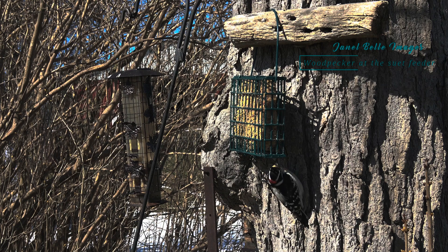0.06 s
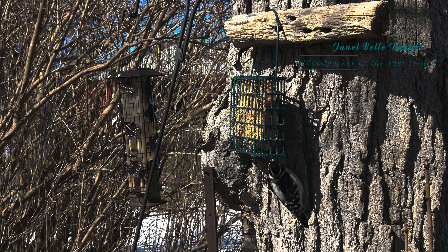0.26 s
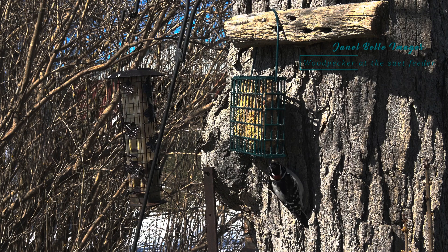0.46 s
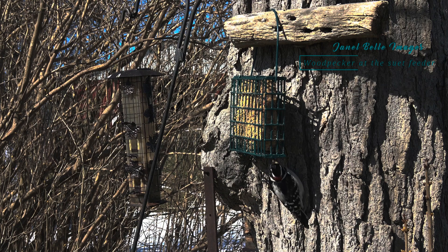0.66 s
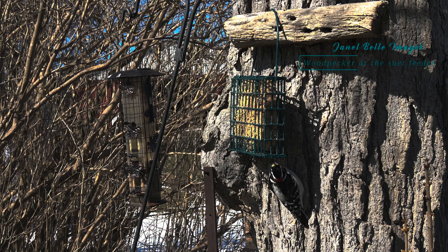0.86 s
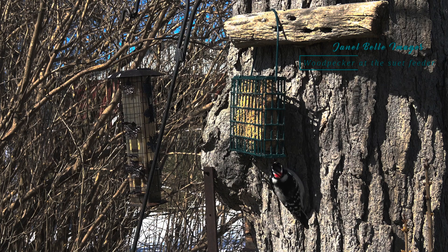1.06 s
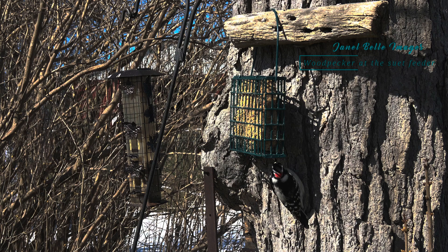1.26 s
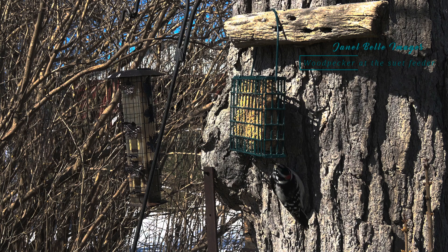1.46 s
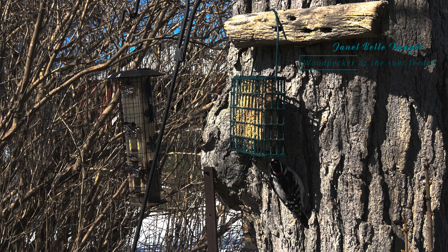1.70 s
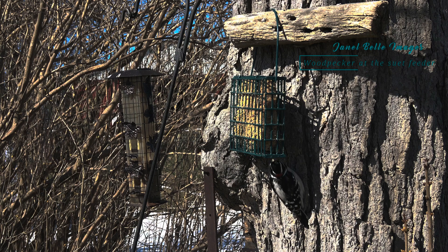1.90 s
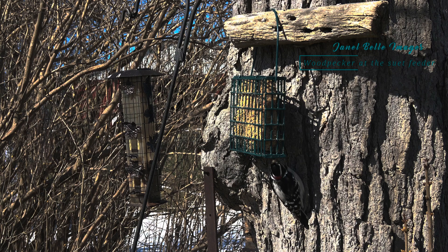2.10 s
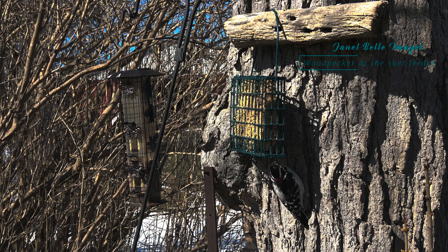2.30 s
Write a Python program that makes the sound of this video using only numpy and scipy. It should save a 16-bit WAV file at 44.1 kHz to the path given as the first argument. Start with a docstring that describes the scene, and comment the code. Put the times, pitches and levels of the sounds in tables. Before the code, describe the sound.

A small songbird gives high rising whistles and a buzzy trill over faint distant traffic.

```python
"""A small songbird sings near a feeder in a winter garden, using both sides of its voice box (syrinx).
First, two thin rising whistles ride over low arched notes and rasps. Then other birds start to chirp
far off, and the song ends with a rattle of ticks, a buzzy trill and a last low chip.
All along, trunk and shrubs scatter the sound, and distant traffic rumbles under a faint hiss."""
import sys
import numpy as np
from scipy import signal
from scipy.fft import rfft, irfft
from scipy.io import wavfile
from scipy.ndimage import uniform_filter1d

SR = 44100
rng = np.random.default_rng(int(sys.argv[2]) if len(sys.argv) > 2 else 0)


def persist_wave(psi):
    """Save psi, clipped to +-1, as 16-bit WAV."""
    counts = np.round(np.clip(psi, -1, 1) * 32767).astype(np.int16)
    wavfile.write(sys.argv[1], SR, np.atleast_2d(counts).T)


N = 108045
TIME = np.arange(N) / SR

# The high voice, one table per whistle: (time [s], pitch [Hz], level [dB])
HIGH_WHISTLES = [
    [(0, 7320, -75), (.07, 7160, -65.5), (.125, 7440, -62), (.148, 7810, -57.5), (.19, 7800, -49),
     (.22, 8095, -46.5), (.268, 7975, -45.5), (.302, 8400, -39.5), (.345, 8245, -41), (.398, 8340, -34.5),
     (.425, 8480, -32.5), (.458, 8550, -34), (.473, 8420, -31), (.488, 7020, -45)],
    [(.63, 6440, -57.5), (.65, 6700, -80), (.698, 7170, -60), (.735, 7416, -59.5), (.83, 7244, -60),
     (.915, 7040, -49.5), (.974, 7550, -45), (1.014, 7786, -44.5), (1.098, 8100, -40), (1.155, 7970, -38),
     (1.22, 8110, -41.5), (1.25, 7920, -37), (1.272, 8255, -37.5), (1.283, 7290, -50), (1.3, 7610, -54.5)],
]
# Fast flutters that add side tones: (start [s], end [s], level against the whistle [dB])
WHISTLE_FLUTTERS = [(0.22, 0.274, -25.5), (0.309, 0.406, -19.5), (1.06, 1.086, -27.5)]
# The low voice, one table per note: (time [s], pitch [Hz], level [dB])
LOW_VOICE_NOTES = [
    [(.142, 2100, -72), (.162, 2345, -73.5), (.177, 3530, -56.5), (.2, 3315, -61), (.235, 2780, -74)],
    [(.595, 3300, -61), (.611, 3100, -49), (.618, 3500, -50), (.622, 2750, -46), (.627, 3300, -54)],
    [(.918, 2230, -72), (.945, 2420, -68.5), (.975, 3333, -58.5), (.995, 3622, -56.5), (1.025, 3180, -55),
     (1.056, 2774, -76)],
    [(1.279, 2500, -68), (1.289, 3400, -53), (1.295, 4050, -60), (1.302, 3050, -53), (1.312, 2800, -70)],
    [(1.768, 3613, -68), (1.786, 3228, -51), (1.798, 2920, -53)],
    [(1.846, 4050, -68), (1.86, 4310, -65.5), (1.89, 3620, -71.5), (1.96, 3710, -83), (2.12, 3890, -78),
     (2.162, 4140, -64)],
    [(2.171, 2500, -63), (2.179, 3150, -48), (2.1825, 3350, -61), (2.186, 3450, -48), (2.19, 3600, -61),
     (2.2, 3990, -64)],
]

# Rasps: (middle [s], half length [s], level [dB], treble change [dB])
RASP_BURSTS = [(0.612, 0.0082, -46.5, -5.5), (1.293, 0.012, -64, -7), (1.788, 0.012, -56, -11)]
# The noise in a rasp: (frequency [Hz], relative level [dB])
RASP_SPECTRUM = [(700, -33.5), (1200, -14), (3000, -2.5), (6500, -11.5), (16000, -37)]

# The rattle: (start [s], ping strength [dB], tick strength [dB])
RATTLE_PULSES = [(1.7085, -43, -54), (1.7176, -37, -49), (1.7262, -35, -49), (1.7351, -33, -48),
                 (1.7434, -32, -50), (1.7514, -33.5, -58), (1.7695, -42, -70)]
# The noise in a tick: (frequency [Hz], relative level [dB])
TICK_SPECTRUM = [(900, -39), (1650, -3), (3500, -2), (11000, -1), (15500, -11)]

# The trill: (time [s], middle pitch [Hz], level before throat and throb [dB])
TRILL_PATH = [(1.798, 7300, -60), (1.812, 6590, -57), (1.834, 6760, -45.5), (1.86, 6300, -45.5),
              (1.9, 6234, -53), (2.11, 5760, -53.5), (2.148, 6540, -47.5), (2.168, 6100, -57)]
# Its pitch swings: (time [s], size [Hz], swings per second [Hz])
TRILL_SWINGS = [(1.87, 0, 140), (1.892, 720, 122), (1.93, 880, 110), (1.98, 900, 98), (2.04, 980, 100),
                (2.095, 1050, 89), (2.15, 1400, 110)]

# Echoes from nearby surfaces: (delay [s], relative level [dB])
NEAR_ECHOES = [(.0053, -16.5), (0.016, -16.5)]
# How long the shrubs echo: (frequency [Hz], time to fade by 60 dB [s])
SHRUB_FADE = [(1000, 0.5), (8300, 0.44), (14000, 0.1)]

# Distant birds: (start [s], length [s], first pitch [Hz], last pitch [Hz], warble size [Hz], level [dB])
DISTANT_CHIRPS = [(1.5, 0.16, 2563, 2710, 372.5, -68), (1.517, 0.047, 6000, 5680, 2, -72),
                  (1.617, 0.07, 3730, 3570, 4, -75.5), (2.201, 0.062, 2590, 3155, 223, -67),
                  (2.293, 0.094, 3207, 3950, 112, -74.5), (2.391, 0.11, 2404, 2860, 405.5, -70.5),
                  (2.416, 0.032, 5890, 5970, -5, -67.5)]

# The roar of traffic and air: (frequency [Hz], relative level [dB])
ROAR_SPECTRUM = [(28, -28.5), (46, -1), (90, -6), (160, -4.5), (290, -15.5), (520, -15), (850, -21),
                 (1080, -19.5), (1300, -22), (1700, -17.5), (2500, -33), (3510, -35), (6500, -86)]
# How the traffic leans to the left: (frequency [Hz], left minus right [dB])
TRAFFIC_BALANCE = [(125, 1.2), (350, 3), (1200, 8.2), (5000, 1.2)]
# Traffic swelling and fading: (time [s], roar change [dB], engine level [dB])
TRAFFIC_SWELL = [(0, -2, -68.5), (0.796, 1.5, -77), (1.15, 2, -66.5), (1.799, 1.5, -68.5),
                 (2.45, 2.5, -72.5)]
# The engine's tones: (multiple of its pitch, relative level [dB])
ENGINE_TONES = [(1, 0), (1.5, -4.5), (2, -9)]
# Faint whines in the traffic: (pitch [Hz], level [dB])
TRAFFIC_WHINES = [(497, -83.5), (579, -82), (1075, -84)]
# The hiss: (frequency [Hz], relative level [dB])
HISS_SPECTRUM = [(6000, -1.5), (14000, -7)]


def two_voices():
    """One side of the voice box whistles, the other sings low; together they make extra tones."""
    second_harmonic_db, flutter_hz = -27.5, 1010
    octave_db, throat_hz, throat_width_hz = 2, 5100, 910
    sum_db, difference_db, upper_db = -13.5, -19, -19
    waver_hz, shimmer = 28.7 * drift(180), amp(0.6 * drift(180))
    flutter_depth = sum(2 * amp(db) * arch(start, end) for start, end, db in WHISTLE_FLUTTERS)
    flutter = flutter_depth * np.sin(2 * np.pi * flutter_hz * TIME)
    out, high, rough_hz = np.zeros(N), np.zeros(N, complex), 100.7 * drift(428)
    for rows in HIGH_WHISTLES:
        hz, level = follow(rows)
        angle = phase(hz + waver_hz) + flutter
        out += level * shimmer * (np.sin(angle) + amp(second_harmonic_db) * np.sin(2 * angle))
        sounding = uniform_filter1d(1. * (level > 0), size=1200)
        high += np.exp(1j * angle) * sounding
    hoarseness = np.exp(1j * .45 * drift(900))  # only for the extra tones
    for rows in LOW_VOICE_NOTES:
        hz, level = follow(rows)
        length_s = rows[-1][0] - rows[0][0]
        if length_s < .05:  # short chips are rough
            hz = hz + rough_hz
        else:  # longer notes bend smoothly
            hz = uniform_filter1d(hz, size=600)
        low = np.exp(1j * phase(hz + waver_hz))
        # The octave swells as it passes the pitch at which the throat rings.
        octave = abs(high) * amp(octave_db) / (1 + ((2 * hz - throat_hz) / throat_width_hz) ** 2)
        # Multiplying these tones adds their pitches; dividing subtracts them.
        mixed = high * (amp(sum_db) * low + amp(difference_db) / low)
        mixed += high * amp(upper_db) * (low ** 2 + high / low)
        out += level * (low + (octave * low ** 2 + mixed) * hoarseness).imag
    return out


def rasps():
    """The voice box breaks into short bursts of uneven noisy pulses, some bright and some dull."""
    pulse_hz, treble_hz = 330, 4270
    pulses = 1 + 0.96 * np.cos(phase(pulse_hz * (1 + 0.362 * drift(pulse_hz))))
    source = unit(pulses * noise(RASP_SPECTRUM))
    body = cut_treble(source, treble_hz, steepness=20)
    out = np.zeros(N)
    for middle, half_length, db, treble_db in RASP_BURSTS:
        distance = ((TIME - middle) / half_length) ** 2
        swell = np.exp(-.5 * distance * (1 + 0.26 * distance))
        out += amp(db) * swell * (body + amp(treble_db) * (source - body))
    return out


def rattle():
    """Each pulse opens with a dry tick, swoops down and rings on as a rough high ping."""
    ping_hz, swoop_hz = 8844, 1220
    ping_rise_s, ping_fall_s, tick_fall_s = .0019, .0021, .00087
    out, crack, rough_hz = np.zeros(N), noise(TICK_SPECTRUM), 89 * drift(330)
    for start, ping_db, tick_db in RATTLE_PULSES:
        age = np.maximum(TIME - start, 0)
        tick = np.exp(-age / tick_fall_s)
        hz = ping_hz + rough_hz + swoop_hz * tick
        ping = (1 - np.exp(-(age / ping_rise_s) ** 2)) * np.exp(-age / ping_fall_s)
        out += amp(ping_db) * ping / ping.max() * np.sin(phase(hz * (age > 0)))
        out += 2 * amp(tick_db) * (age > 0) * tick * crack
    return out


def trill():
    """A sliding whistle starts to swing quickly through the pitch at which the throat rings."""
    throat_hz, throat_width_hz = 6035, 565
    jitter_hz, throb_db, second_harmonic_db = 151, 5, -31
    middle_hz, level = follow(TRILL_PATH)
    swing_hz, rate_hz = curves(TRILL_SWINGS)
    start, full_swing_hz = TRILL_SWINGS[0][0], TRILL_SWINGS[1][1]
    cycle = phase(rate_hz * (TIME > start))
    depth = np.minimum(swing_hz / full_swing_hz, 1)
    zigzag = 2 / np.pi * np.arcsin(np.cos(cycle))
    hz = middle_hz + swing_hz * amp(drift(114)) * zigzag + jitter_hz * drift(510) * depth
    throat = 1 / np.sqrt(1 + ((hz - throat_hz) / throat_width_hz) ** 4)
    throb = amp(depth * throb_db * np.cos(cycle))  # a boost at the top of each swing
    angle = phase(hz)
    return level * throb * throat * (np.sin(angle) + amp(second_harmonic_db) * np.sin(2 * angle))


def near_echoes(sound):
    """The sound bounces once off the trunk, feeders and snow."""
    return sum(amp(db) * np.pad(sound, (round(delay * SR), 0))[:N] for delay, db in NEAR_ECHOES)


def shrubs(sound, width=0.27, bounces_per_s=3000, gap_s=.006):
    """Twigs scatter the sound into a thin tail of tiny echoes."""
    bounces = rng.standard_normal((2, SR)) * (rng.random((2, SR)) < bounces_per_s / SR)
    bounces *= np.arange(SR) > gap_s * SR
    hz, age, spectrum = signal.stft(bounces, SR, nperseg=256)
    fade = amp(-60 * age / read(SHRUB_FADE, hz)[:, None])
    tail = signal.istft(spectrum * fade, SR, nperseg=256)[1]
    middle, side = signal.fftconvolve(sound[None], tail / np.linalg.norm(tail[0]), axes=1)[:, :N]
    return np.array([middle + width * side, middle - width * side])


def far_birds(warble_rate_hz=65.8):
    """Other birds sing faint slides and warbles."""
    out, waver = np.zeros(N), drift(616)
    for start, length, first_hz, last_hz, warble_hz, db in DISTANT_CHIRPS:
        hz = np.interp(TIME, [start, start + length], [first_hz, last_hz])
        hz += warble_hz * np.sin(2 * np.pi * warble_rate_hz * (TIME - start))
        hz += waver * (25 + .45 * warble_hz)  # wider warbles are rougher
        out += np.sqrt(2) * amp(db) * arch(start, start + length) * np.sin(phase(hz))
    return out


def traffic(roar_db=-66.5, likeness=.96, patch_db=2.2, engine_hz=80.9):
    """Distant traffic and air make a soft roar, much alike in both ears, with a wavering engine hum."""
    frames, hz = N // 512 + 5, np.fft.rfftfreq(2048, 1 / SR)
    draws = rng.standard_normal((5, frames, len(hz)))
    left, separate = draws[0] + 1j * draws[1], draws[2] + 1j * draws[3]
    right = likeness * left + np.sqrt(1 - likeness ** 2) * separate
    # Narrow bands of the roar slowly grow louder and softer.
    patches = unit(uniform_filter1d(uniform_filter1d(draws[4], size=120, axis=0), size=3, axis=1))
    lean = amp(read(TRAFFIC_BALANCE, hz) / 2)
    spectrum = np.array([left * lean, right / lean]) * amp(read(ROAR_SPECTRUM, hz) + patch_db * patches)
    roar = signal.istft(spectrum, nperseg=2048, noverlap=1536, time_axis=-2, freq_axis=-1)[1][:, :N]
    engine = sum(amp(db) * np.sin(phase(multiple * (engine_hz + 1.6 * drift(6.8))))
                 for multiple, db in ENGINE_TONES)
    swell_db, engine_db = curves(TRAFFIC_SWELL)
    return unit(roar) * amp(roar_db + swell_db) + np.sqrt(2) * engine * amp(engine_db)


def traffic_whines():
    """Wavering whines fade in and out of the traffic roar."""
    out = np.zeros((2, N))
    for hz, db in TRAFFIC_WHINES:
        lean_db = np.array([[.5], [-.5]]) * read(TRAFFIC_BALANCE, hz)
        out += np.sqrt(2) * amp(db + lean_db) * drift(5.3) * np.sin(phase(hz + 1.6 * drift(5.5)))
    return out


def hiss():
    """A faint, steady hiss, mostly shared by both ears."""
    shared, left, right = [noise(HISS_SPECTRUM) for _ in range(3)]
    return amp(-79) * (shared + .5 * np.array([left, right]))


def amp(db):
    """Turns decibels into a number to multiply by."""
    return 10 ** (np.asarray(db) / 20)


def unit(x):
    """Scales a signal to an average strength (rms) of 1."""
    return x / np.sqrt(np.mean(x ** 2) + 1e-20)


def read(table, hz):
    """Looks up a frequency in a table, with octaves evenly spaced."""
    table_hz, values = np.transpose(table)
    return np.interp(np.log(hz + 1), np.log(table_hz + 1), values)


def noise(spectrum):
    """Noise with its lows and highs shaped by a table."""
    gain = amp(read(spectrum, np.fft.rfftfreq(N, 1 / SR)))
    return unit(irfft(rfft(rng.standard_normal(N)) * gain, N))


def cut_treble(x, hz, steepness):
    """Turns down everything above the given frequency."""
    return irfft(rfft(x) / (1 + (np.fft.rfftfreq(N, 1 / SR) / hz) ** steepness), N)


def drift(rate_hz):
    """A random wobble, up to about the given rate."""
    return unit(cut_treble(rng.standard_normal(N), rate_hz, steepness=4))


def phase(hz):
    """Adds up a changing pitch into the angle of a wave."""
    return 2 * np.pi * np.cumsum(hz) / SR


def curves(rows):
    """Joins a table's points over time, one curve per column after the first."""
    times, *columns = np.transpose(rows)
    return [np.interp(TIME, times, column) for column in columns]


def follow(rows, edge_s=0.00082):
    """A note's pitch and strength over time, with soft ends."""
    hz, db = curves(rows)
    inside_s = np.minimum(TIME - rows[0][0], rows[-1][0] - TIME)
    fade = np.sin(np.pi / 2 * np.clip(inside_s / edge_s, 0, 1)) ** 2
    return hz, np.sqrt(2) * fade * amp(db)


def arch(start, end):
    """A rounded swell between two times."""
    return np.sqrt(abs(np.sin(np.pi * np.clip((TIME - start) / (end - start), 0, 1))))


def scene():
    """The birds and their echoes, a little to the left, over the traffic."""
    singer, far = two_voices() + rasps() + rattle() + trill(), far_birds()
    scattered = shrubs(amp(-18.5) * singer + amp(-9) * far)
    birds = singer + far + near_echoes(singer + far) + scattered
    lean_left = amp([[1], [-1]])
    return (birds + hiss()) * lean_left + traffic() + traffic_whines()


def record(dry):
    """Cuts off the very highest treble."""
    top_hz = 15850
    treble_filter = signal.firwin(511, top_hz, window=("kaiser", 9), fs=SR)
    return signal.oaconvolve(dry, treble_filter[None], "same")


dry = scene()
out = record(dry)
persist_wave(out)
```